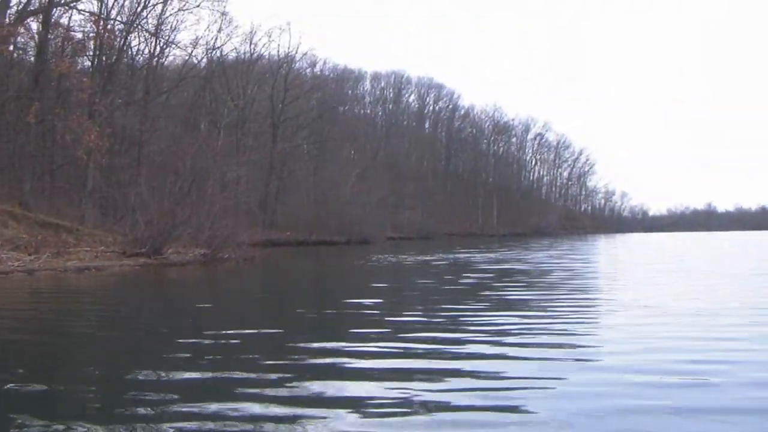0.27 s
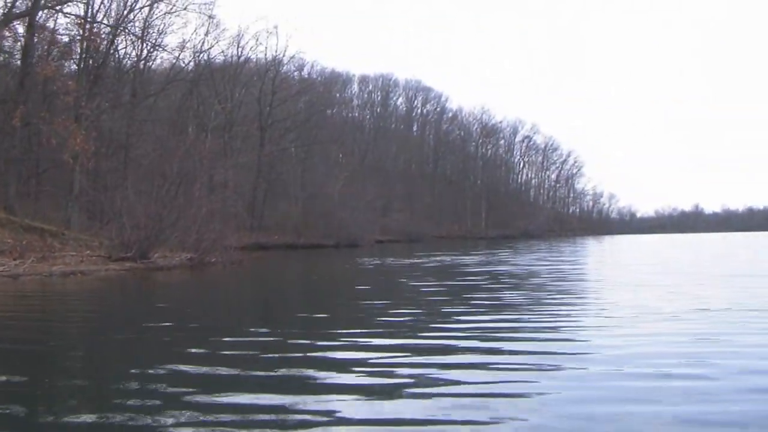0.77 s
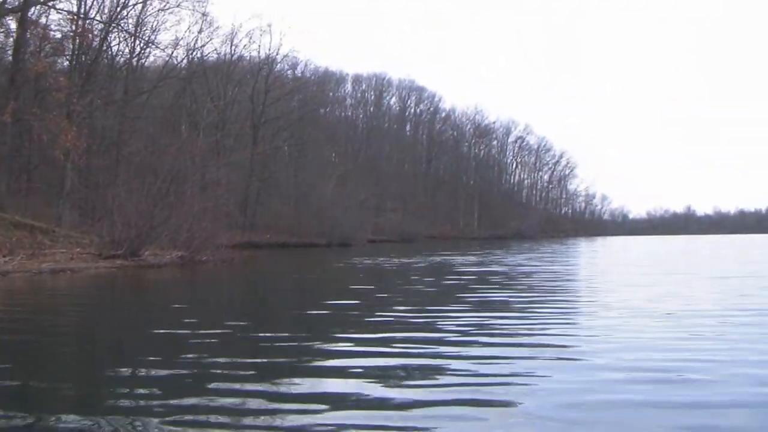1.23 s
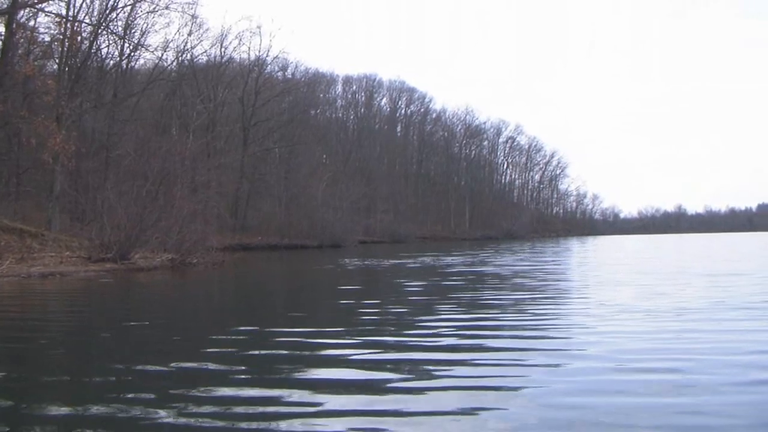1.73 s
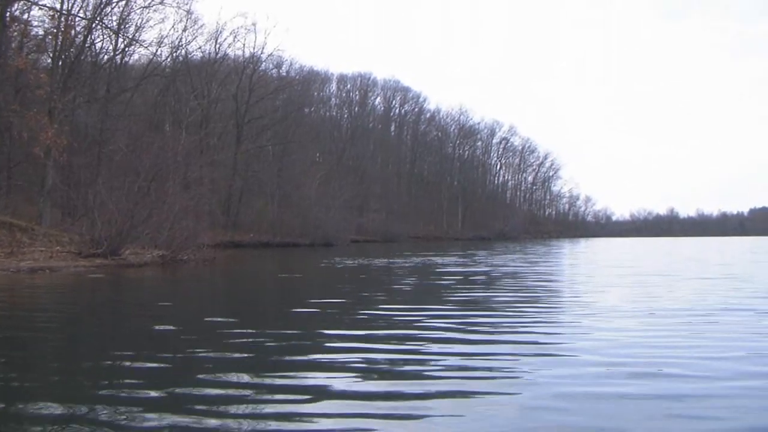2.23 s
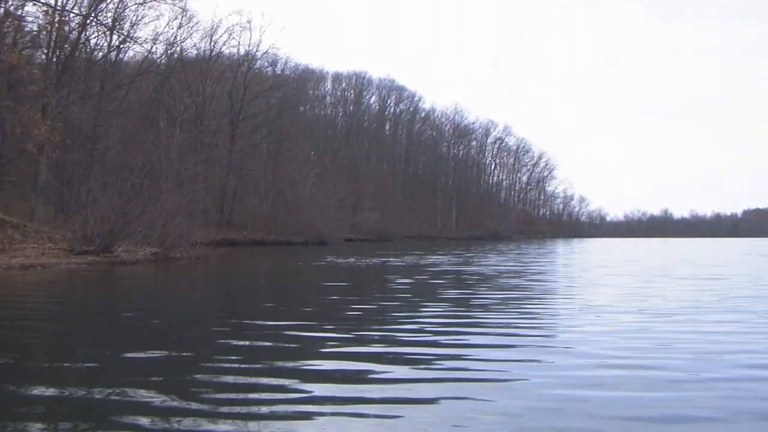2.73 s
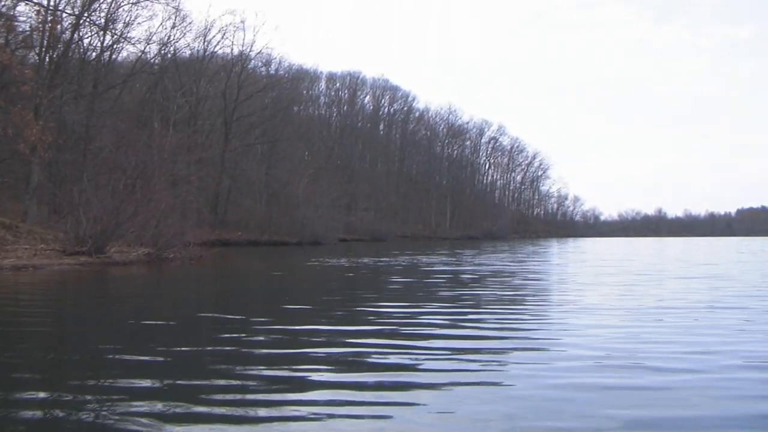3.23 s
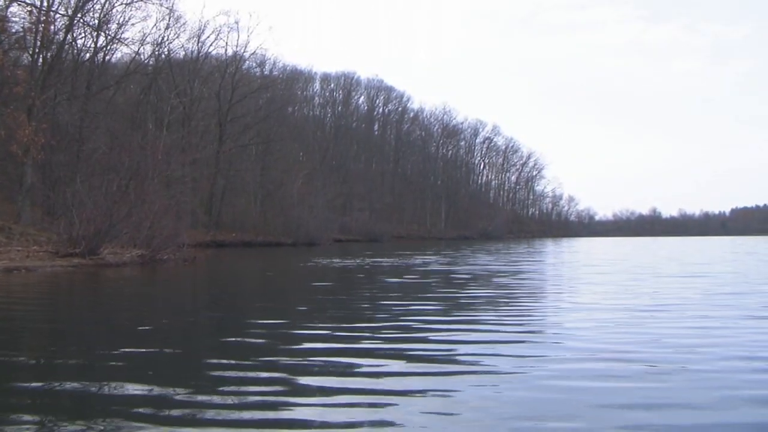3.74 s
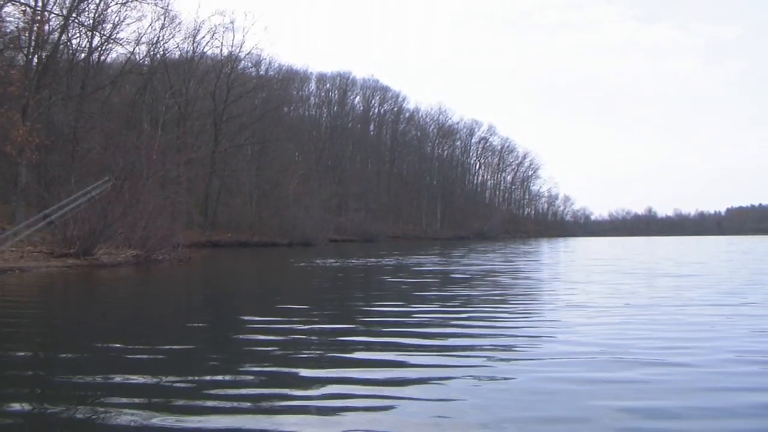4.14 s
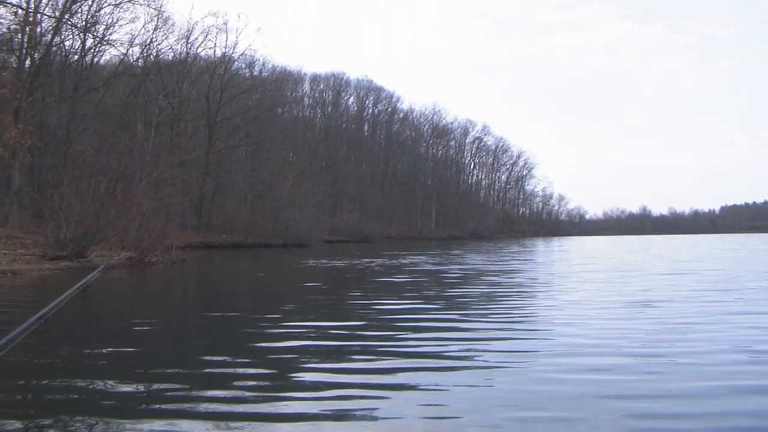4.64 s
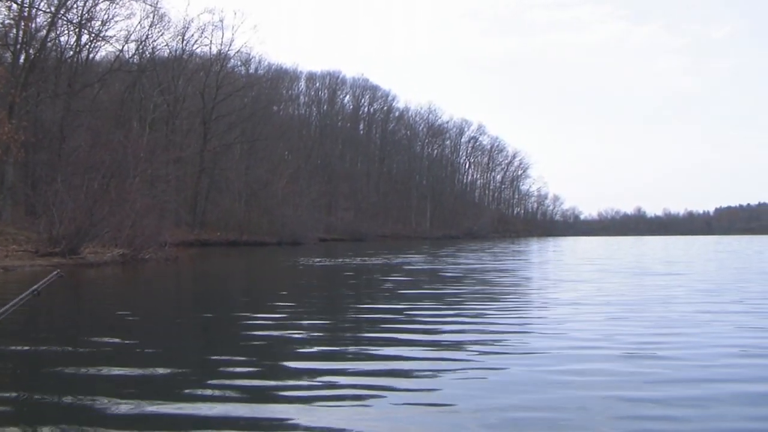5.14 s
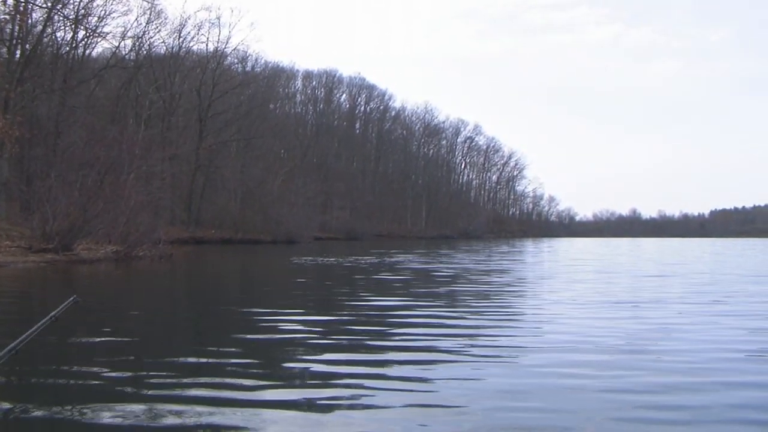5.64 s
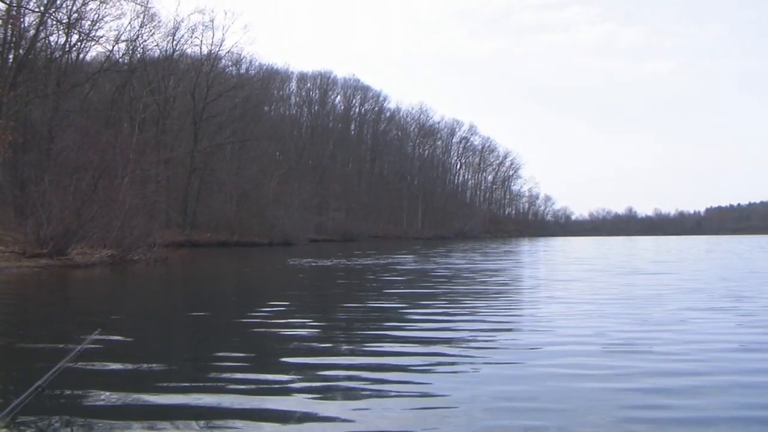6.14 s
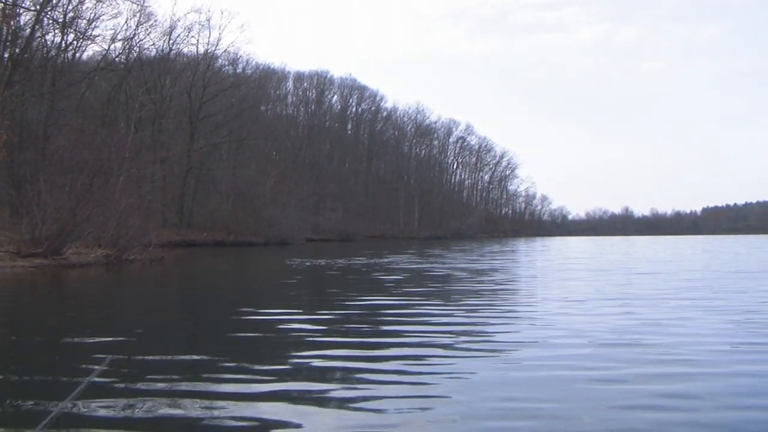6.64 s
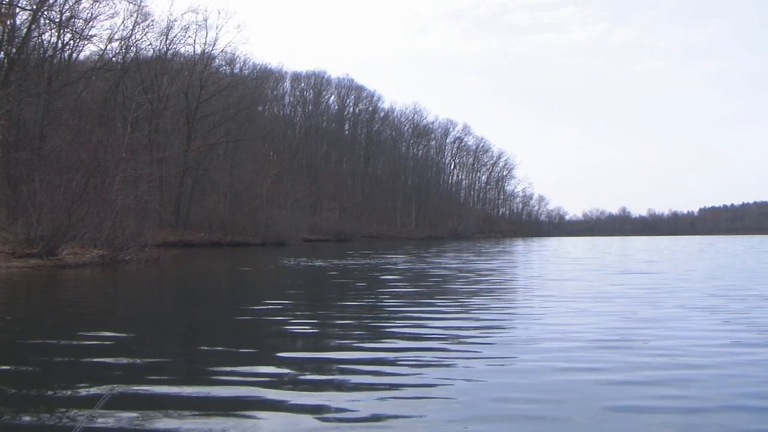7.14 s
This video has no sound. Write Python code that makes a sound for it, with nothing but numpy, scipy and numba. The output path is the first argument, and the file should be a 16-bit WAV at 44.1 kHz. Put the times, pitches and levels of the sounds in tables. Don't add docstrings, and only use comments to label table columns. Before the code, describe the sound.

Outdoors on a still lake, a small stereo camera microphone sits near an angler to its left. A brief rod swish gives way to bright line hiss with irregular ticks, fading within a second. A hard, bouncing metal reel snap comes next, then soft handling clicks. Distant birds whistle, chuckle, rasp and trill from the wooded shore; late on, four even wooden knocks and a muffled vehicle passing right, over steady traffic hush.

```python
import sys
import numpy as np
from scipy import signal
from scipy.fft import rfft, irfft, next_fast_len
from scipy.io import wavfile
from scipy.ndimage import uniform_filter1d
from numba import njit

SR = 44100
rng = np.random.default_rng(int(sys.argv[2]) if len(sys.argv) > 2 else 0)


def master_out(mix):
    frames = np.transpose(np.atleast_2d(mix))
    ceiling = np.clip(frames, -1, 1)
    pcm = np.round(ceiling * 32767).astype(np.int16)
    wavfile.write(sys.argv[1], SR, pcm)


def amplitude_ratio(level_db):
    exponent = np.asarray(level_db, float) / 20
    return 10 ** exponent


N = 326163
T = np.arange(N) / SR
PADDED = next_fast_len(N)
LOG_HZ = np.log(np.arange(PADDED // 2 + 1) * SR / PADDED + 1)


def band(x, lo_hz, hi_hz, order=2):
    y = signal.sosfilt(signal.butter(order, [lo_hz, hi_hz], "bandpass", fs=SR, output="sos"), x)
    return y / np.sqrt(np.mean(y ** 2))


def walk(rate):
    k = int(SR / rate)
    steps = np.repeat(rng.standard_normal(N // k + 1), k)
    return 1.1 * uniform_filter1d(uniform_filter1d(steps, k), k)[:N]


def curve(table, column, quiet_db=None):
    rows = np.array(table)
    return np.interp(T, rows[:, 0], rows[:, column], quiet_db, quiet_db)


def crackle(spread_db):
    return rng.standard_normal(N) * amplitude_ratio(spread_db * np.minimum(rng.exponential(size=N), 6))


@njit
def sweep(x, hz, damping):
    y, b, l = np.empty(len(x)), 0., 0.
    for i in range(len(x)):
        g = np.tan(np.pi * hz[i] / SR)
        v = (b + g * (x[i] - l)) / (1 + g * (g + damping[i]))
        b, l, y[i] = 2 * v - b, l + 2 * g * v, damping[i] * v
    return y


def place(x, pan_db, lead):
    hz = np.exp(LOG_HZ)
    turn = np.exp(.5j * lead * hz / (hz + 150) / (1 + (hz / 16000) ** 2))
    ports = np.array([turn * amplitude_ratio(pan_db / 2), amplitude_ratio(-pan_db / 2) / turn])
    return irfft(rfft(x, PADDED) * ports, PADDED)[:, :N]


def woods(x, t60_s, wet_db, onset_s=0.0089):
    t = np.arange(SR) / SR
    tail = rng.standard_normal((2, SR)) * 1000. ** (-t / t60_s) * np.clip(t / onset_s, 0, 1)
    tail /= np.sqrt(np.sum(tail ** 2, axis=1, keepdims=True))
    return amplitude_ratio(wet_db) * signal.fftconvolve(x[None], tail, axes=1)[:, :N]


def coloured(spectrum, likeness):
    spectrum_hz, spectrum_db = np.transpose(spectrum)
    likeness_hz, likeness_share = np.transpose(likeness)
    gain = amplitude_ratio(np.interp(LOG_HZ, np.log(spectrum_hz + 1), spectrum_db))
    share = np.clip(np.interp(LOG_HZ, np.log(likeness_hz), likeness_share), 0, 1)
    mid, side = rfft(rng.standard_normal((2, PADDED)))
    pair = gain * (np.sqrt(1 + share) * mid + np.sqrt(1 - share) * side * np.array([[1], [-1]]))
    pair[0] *= np.exp(.25j * np.clip(LOG_HZ - 6, 0, 3))
    out = irfft(pair, PADDED)[:, :N]
    return out / np.sqrt(np.mean(out ** 2))


def whistle(notes, edge_s):
    out = np.zeros(N)
    for note in notes:
        s, hz, db = np.array(note).T
        start = int(s[0] * SR)
        t = T[start:int(s[-1] * SR)]
        ends = np.clip(np.minimum(t - s[0], s[-1] - t) / edge_s, 0, 1)
        tone = np.sin(2 * np.pi * np.cumsum(np.interp(t, s, hz)) / SR)
        out[start:][:len(t)] += np.sqrt(2) * amplitude_ratio(np.interp(t, s, db)) * ends * tone
    return out


def arches(rows, shape, edge_s):
    u = np.linspace(0, 1, 9)
    bend = np.polyval(np.polyfit(np.linspace(0, 1, len(shape)), shape, len(shape) - 1), u)
    return whistle([np.transpose([s + length * u, hz * bend, db + 0 * u]) for s, length, hz, db in rows], edge_s)


def glides(rows, by_middle, edge_s):
    return whistle([[(s, a, db), (s + length / 2, a + by_middle * (b - a), db), (s + length, b, db)]
                    for s, length, a, b, db in rows], edge_s)


# (time [s], level [dB])
SWISH = [
    (0.0, -33),
    (0.006, -34.5),
    (0.108, -55),
    (0.166, -56.5),
    (0.206, -63),
    (0.45, -67),
    (0.55, -69),
    (0.7, -81),
]


def rod():
    level_db = curve(SWISH, 1, -120) + 1.64 + 0.57 * walk(156)
    treble = amplitude_ratio(-3 + 15.5 * np.minimum(T, 1))
    roar = band(crackle(2.9), 590, 4200) + treble * band(crackle(3.8), 3400, 7000)
    thrust = amplitude_ratio(-57) * band(rng.standard_normal(N), 18, 300) * np.exp(-T / 0.021)
    return place(roar * amplitude_ratio(level_db) + thrust, 9.3, 1.7)


# (time [s], level [dB], centre of the hiss [Hz])
PEEL = [
    (0, -40, 11000),
    (.1, -51, 12000),
    (.36, -50.5, 12800),
    (.5, -52.5, 10300),
    (.66, -55.5, 9400),
    (.76, -62, 8500),
    (.84, -68, 7300),
    (.95, -85, 6800),
]
# (time [s], peak level [dB])
SLAPS = [(0.1234, -36), (0.1742, -35), (0.2122, -33.5), (0.2424, -39), (0.3024, -42), (0.3346, -39),
         (0.3631, -39), (0.406, -33), (0.4244, -35), (0.4444, -47), (0.4844, -47), (0.509, -39),
         (0.5236, -38), (0.5414, -34.5), (0.633, -42), (0.6534, -43)]
# (pitch [Hz], width [Hz], level [dB])
GUIDES = [(4030, 60, -3), (4750, 70, -2), (6550, 300, -14)]


def line():
    surge_s, gap_s, lasts_s = 0.567, 0.1, .12
    tugging = np.exp(-((T - surge_s - gap_s / 2) / lasts_s) ** 2 / 2)
    surge = np.cos(2 * np.pi * (T - surge_s) / gap_s) * tugging
    centre_hz = np.clip(curve(PEEL, 2) * (1 + .13 * surge), 3000, 16000)
    share = np.clip(.5 + 1.3 * np.exp(-(T / .27) ** 2), .1, 1.9)
    hiss = sweep(sweep(crackle(2.8), centre_hz, share), centre_hz, share)
    hiss = hiss / np.sqrt(uniform_filter1d(hiss ** 2, size=2000))
    hiss = hiss * amplitude_ratio(curve(PEEL, 1, -120) + 2 * surge + 1.5 * walk(60.5))

    ticks, t = np.zeros(N), np.arange(200) / SR
    for s, peak_db in SLAPS:
        tick = band(rng.standard_normal(200) * np.exp(-t / 0.00078), 2900, 11000)
        ticks[int(s * SR):][:200] += amplitude_ratio(peak_db) * tick / np.abs(tick).max()
    rub = ticks + amplitude_ratio(-53) * crackle(2.7) * (T > .2) * (T < .55)
    rings = np.zeros(N)
    for hz, width_hz, db in GUIDES:
        rings += amplitude_ratio(db) * sweep(rub, hz * (1 + .012 * walk(12)), np.full(N, width_hz / hz))
    return place(hiss + amplitude_ratio(-2.0) * ticks + amplitude_ratio(6.0) * rings, 9.8, 2.3)


# (frequency [Hz], level [dB per Hz])
FAR = [(18, -66), (30, -34), (42, -22), (85, -9), (130, -13), (213, -6), (249, -6), (575, -4), (728, 0),
       (1720, -2.5), (3230, -11), (4420, -14), (6210, -16), (15500, -20)]
# (frequency [Hz], likeness [0 to 1])
LIKENESS = [(60, 0.33), (130, 0.59), (290, 0.5), (640, 0.24), (1410, 0.58), (3100, 0.094), (6820, 0.092),
            (15000, 0.061)]


def traffic_and_hiss():
    return coloured(FAR, LIKENESS) * amplitude_ratio(-56.5 + 0.34 * walk(14))


# (time [s], length [s], pitch [Hz], level [dB])
LOW_NOTES = [
    (.5, 0.095, 2260, -63),
    (.765, 0.11, 2240, -63),
    (1.54, 0.11, 2240, -63),
    (1.82, .11, 2250, -64),
    (2.5, .09, 2230, -75),
    (3.3, .11, 2390, -69),
    (5.93, 0.17, 2400, -80),
]
HIGH_NOTES = [
    (.615, .06, 2800, -61.5),
    (.898, 0.068, 2860, -59),
    (1.68, 0.057, 2850, -56),
    (1.952, 0.068, 2870, -61.5),
    (2.62, 0.068, 2830, -65),
]
FLAT_NOTES = [
    (2.135, .075, 2600, -61),
    (2.32, .08, 2610, -65),
    (2.65, .08, 2400, -68),
    (2.33, .09, 2850, -71),
    (4.1, .35, 2880, -74),
]


def song():
    rise, hook, flat = (.94, 1, 1.025), (1.1, 1.02, .995, 1, 1.027), (0.97, 1, 1.01)
    notes = arches(LOW_NOTES, rise, 0.0086) + arches(HIGH_NOTES, hook, 0.0056) + arches(FLAT_NOTES, flat, .02)
    return place(notes, .1, 1.0) + woods(notes, 0.5, -9)


# (time [s], wire level [dB], wire over body [dB], contact [s])
SNAP = [(1.3483, -34, 10, .002), (1.3520, -39.5, -5, 0.0054), (1.3626, -20, 26, .00084),
        (1.3644, -21, 20, .0023), (1.3668, -29, 5, .0022), (1.3710, -21.5, 6, .0013),
        (1.3739, -14.5, 7, 0.0013), (1.3760, -22.5, 3.5, 0.0019), (1.3791, -26, -1.5, .002),
        (1.3824, -28, 0, 0.0021), (1.3865, -43, -13, 0.0037), (1.4040, -27, 2.5, 0.0027),
        (1.4080, -26, 9, 0.0022), (1.4140, -30.5, .4, 0.0015), (1.4190, -52, -14, 0.0059)]
# (time [s], wire level [dB], wire over body [dB])
TAPS = [(.604, -51, -9), (1.7235, -56, 4), (1.7544, -58, -10), (1.8284, -46, 9.5), (1.8424, -46, -1),
        (2.2204, -47, 14), (2.2394, -57, 5), (3.8487, -49, 9), (3.899, -49, 15), (4.2552, -50, 10),
        (4.7995, -55, 7), (4.9048, -48, 11), (5.0147, -59, -4)]
# (time [s], wire level [dB], wire over body [dB], handle level [dB])
CRANK = [
    (1.454, -43, 7.5, -58),
    (1.474, -42, 11, -62),
    (1.5048, -36.5, 8.5, -48),
    (1.5072, -41, 8, -47),
    (1.5155, -52, -3, -51),
    (1.5207, -37.5, -11, -36.5),
    (1.5239, -40, -6, -55),
    (1.5285, -33, 22, -52),
]


def knocks():
    def parts(db, wiry, handle_db, spring_db):
        return handle_db, db - wiry, db, db + spring_db + 0.33 * wiry

    rows = [(s, contact_s, parts(db, wiry, db - 18 - 0.63 * wiry, -2.5)) for s, db, wiry, contact_s in SNAP]
    rows += [(s, 0.0014, parts(db, wiry, handle_db, -18)) for s, db, wiry, handle_db in CRANK]
    rows += [(s, 0.0014, parts(db, wiry, db - 7.5 - 0.63 * wiry, -18)) for s, db, wiry in TAPS]
    return rows


# (pitch [Hz], width [Hz], level [dB])
REEL = [(816, 58, 3.5), (1260, 64, -3), (1890, 140, -9), (2144, 35, 0.5), (2460, 97, 2), (3150, 80, -9.5),
        (3550, 60, -15), (5100, 41, -6), (5200, 31, 6), (5550, 28, 3), (6160, 43, 3), (6934, 176, 1),
        (9040, 120, 0), (9440, 22, -3), (10300, 76, 4), (11000, 22, 0), (12960, 26, -4)]
PART_EDGES_HZ = (480, 1500, 3500, 7000, 17000)


def reel():
    out, t = np.zeros(N), np.arange(2048) / SR
    hz, width_hz, db = np.array(REEL).T[:, :, None]
    part = np.searchsorted(PART_EDGES_HZ[1:-1], hz[:, 0])
    damping = np.pi * (width_hz + 0.04 * hz)
    for s, contact_s, parts_db in knocks():
        detune = 1 + .025 * rng.standard_normal((len(REEL), 1))
        modes = amplitude_ratio(db) * np.exp(-damping * t) * np.sin(2 * np.pi * hz * detune * t)
        scrape = rng.standard_normal(2048) * np.exp(-t / max(contact_s, 1e-4))
        scrape[0] += 1.4
        for k, peak_db in enumerate(parts_db):
            edges_hz = PART_EDGES_HZ[k:k + 2]
            ring = band(signal.fftconvolve(scrape, modes[part == k].sum(axis=0))[:2048], *edges_hz)
            ring = ring + (.6, 1.0, 1.2, 1.4)[k] * band(scrape, *edges_hz, order=3)
            out[int(s * SR):][:2048] += amplitude_ratio(peak_db + 0.5) * ring / np.abs(ring).max()
    return place(out, 4.4, 1.67)


# (time [s], length [s], top pitch [Hz], level [dB])
PIPS = [
    (2.991, .024, 1715, -43.5),
    (3.034, 0.023, 1746, -44.5),
    (3.061, .013, 1940, -56),
    (3.074, 0.014, 1670, -53),
    (3.1, .015, 1950, -59),
    (5.473, .02, 1620, -47),
    (5.514, 0.025, 1735, -46),
]
ARCH = (0.763, 1, 0.713)
# (time [s], length [s], start pitch [Hz], end pitch [Hz], level [dB])
MUTTER = [(2.883, .011, 1580, 2110, -52), (2.905, .02, 1150, 1200, -58), (2.945, 0.02, 1150, 1350, -57),
          (2.97, .012, 1200, 1200, -55), (3.087, .013, 1240, 1450, -51), (3.125, .02, 1250, 1680, -61),
          (5.407, .017, 1750, 2280, -57.5), (5.458, .012, 1950, 2070, -56),
          (5.559, .014, 1480, 2030, -49.5), (5.574, .013, 1850, 1380, -50), (5.597, .0075, 1230, 1750, -48),
          (5.606, .017, 1320, 1680, -57), (5.62, .0066, 2050, 1350, -50), (5.656, .008, 1850, 1100, -57)]


def chuckle():
    pips = arches(PIPS, ARCH, 0.0025) + glides(MUTTER, .6, .0027)
    return place(pips, .1, 0.58) + woods(pips, 0.85, -7, 0.022)


# (time [s], length [s], start pitch [Hz], end pitch [Hz], level [dB])
WHISTLES = [(2.983, .03, 4600, 4000, -68), (3.262, .012, 3800, 3550, -67), (3.385, .025, 3650, 3550, -73),
            (3.522, .026, 5150, 5400, -72), (3.672, .03, 3500, 3700, -70), (3.738, .02, 5300, 5080, -70),
            (3.793, .042, 4420, 4550, -63), (3.833, .016, 4500, 4000, -65), (3.868, .04, 4750, 4900, -72),
            (3.94, .028, 5000, 4950, -70), (4.15, .032, 5050, 5450, -76), (4.21, .04, 5050, 4550, -67),
            (4.25, .022, 4550, 4700, -65), (4.456, .03, 5150, 3900, -70), (4.482, 0.032, 3830, 3850, -71),
            (4.518, .055, 4400, 5100, -72), (4.602, .018, 4500, 3900, -70), (4.622, .027, 3850, 4400, -71),
            (4.982, .012, 4950, 4900, -69), (5.37, .016, 3430, 3520, -61), (7.338, .022, 5730, 4200, -63),
            (7.352, 0.017, 5580, 4600, -68)]
# (time [s], length [s], pitch [Hz], level [dB])
DROOPS = [
    (3.203, .05, 4530, -63.5),
    (3.518, .046, 4500, -63.5),
]
DROOP = (1, 0.98, .89)


def whistles():
    chatter = [(2.908 + k * .015, .011, 4700, 5250, -67) for k in range(5)]
    thin = arches(DROOPS, DROOP, 0.0054) + glides(WHISTLES + chatter, .45, .004)
    return place(thin, .1, 0.68) + woods(thin, 0.5, -9)


def rasp():
    after = T - 5.02
    burst = amplitude_ratio(-57.5) * np.exp(-np.abs(after) / np.where(after < 0, .02, 0.0082))
    tail = amplitude_ratio(-69) * (after > 0) * (T < 5.25)
    return place(band(crackle(2.3), 2660, 3200) * (burst + tail), .1, 0.68)


# (time [s], level [dB])
PASSING = [
    (6.0, -82),
    (6.336, -66),
    (7.06, -56.5),
    (7.396, -59.5),
]
# (frequency [Hz], level [dB per Hz])
PASSING_COLOUR = [(88, -47), (150, -23), (370, -5.5), (441, -4.5), (947, 0.5), (1220, -6), (1580, -3),
                  (3000, -40), (3900, -56), (6600, -120)]


def passing_vehicle():
    noise = coloured(PASSING_COLOUR, [(100, 0.57), (3000, 0.55)])
    return noise * amplitude_ratio(curve(PASSING, 1, -120) + 1.5 * walk(9)) * amplitude_ratio(np.array([[-2.0], [2.0]]))


# (pitch [Hz], width [Hz], level [dB])
TRUNK = [(1200, 260, -1), (1750, 300, -1)]


def knocking():
    out, t = np.zeros(N), np.arange(600) / SR
    ring = sum(amplitude_ratio(db) * np.exp(-np.pi * width_hz * t) * np.sin(2 * np.pi * hz * t) for hz, width_hz, db in TRUNK)
    for k in range(4):
        out[int((6.094 + k * .125) * SR):][:600] += amplitude_ratio(-41) * ring / np.abs(ring).max()
    return place(out, -1.5, .4)


# (time [s], level [dB])
TRILL = [
    (6.66, -78),
    (6.98, -79),
    (7.06, -68),
    (7.13, -79),
    (7.28, -78),
    (7.34, -70),
    (7.39, -73),
]


def trill():
    start_s = 6.66
    note = whistle([[(s, 4020 - 200 * (s - start_s), db) for s, db in TRILL]], .02)
    pulse_db = 7 * np.sin(2 * np.pi * 60 * T) / 2 + 1.8 * walk(40)
    pulsed = note * amplitude_ratio(pulse_db)
    return place(pulsed, .1, 0.68) + woods(pulsed, 0.5, -9)


def scene():
    whip = np.clip(0.47 + T / 0.0069, 0, 1)
    near = (rod() + line()) * whip + reel()
    back = woods(near[0], 0.025, -14.0, 0.0021) + woods(near[0], 1.0, -30.5, 0.061)
    birds = song() + chuckle() + whistles() + rasp() + trill()
    return near + back + birds + knocking() + traffic_and_hiss() + passing_vehicle()


def low_pass(x):
    return signal.sosfilt(signal.butter(12, 16810, fs=SR, output="sos"), x)


def record(dry):
    cut = signal.sosfilt(signal.ellip(10, .2, 60, 15850, fs=SR, output="sos"), dry)
    return low_pass(cut)


dry = scene()
out = record(dry)
master_out(out)
```